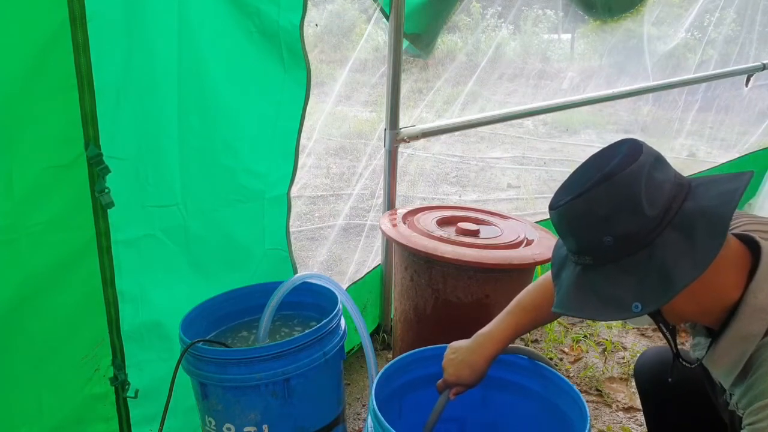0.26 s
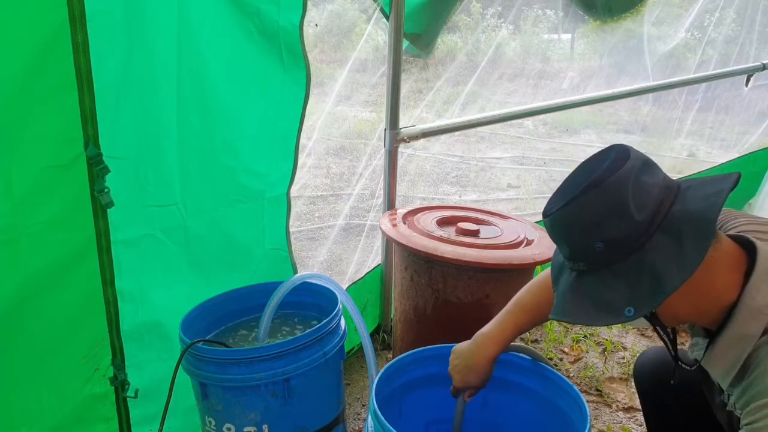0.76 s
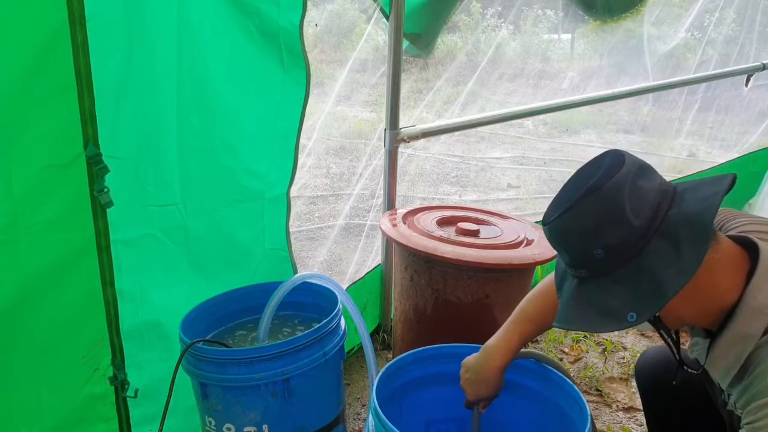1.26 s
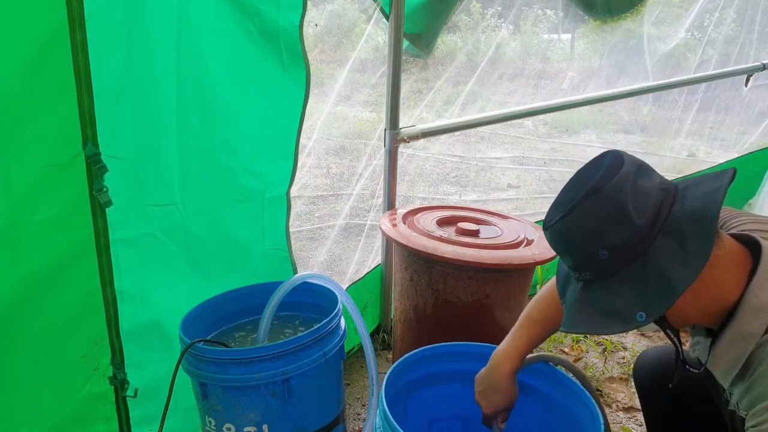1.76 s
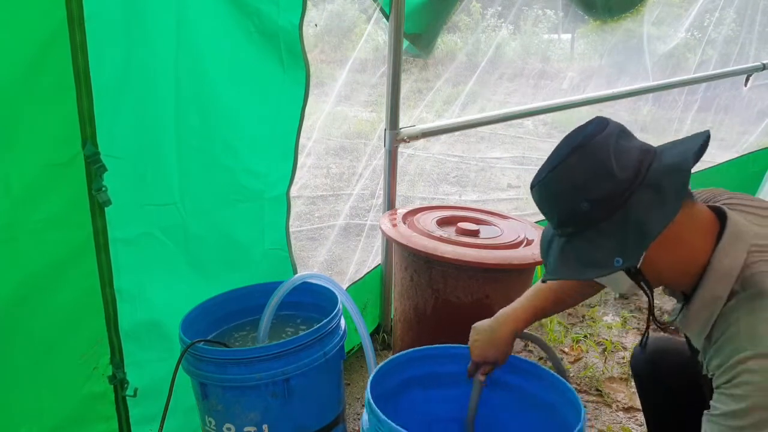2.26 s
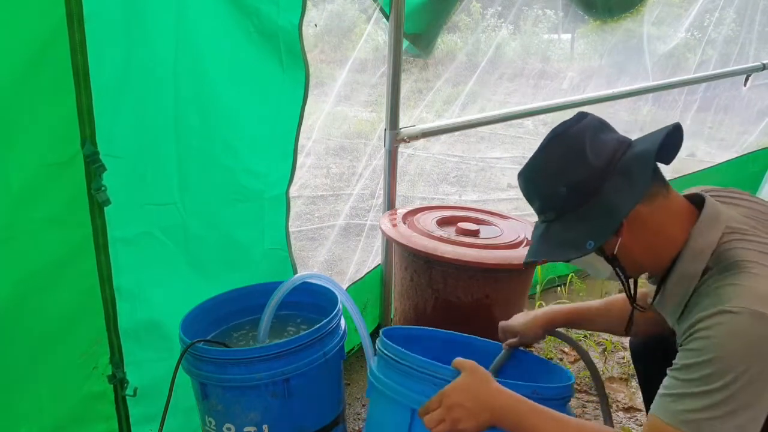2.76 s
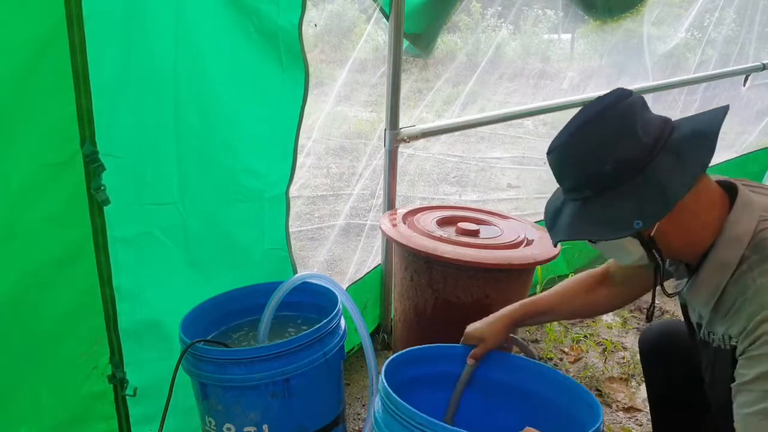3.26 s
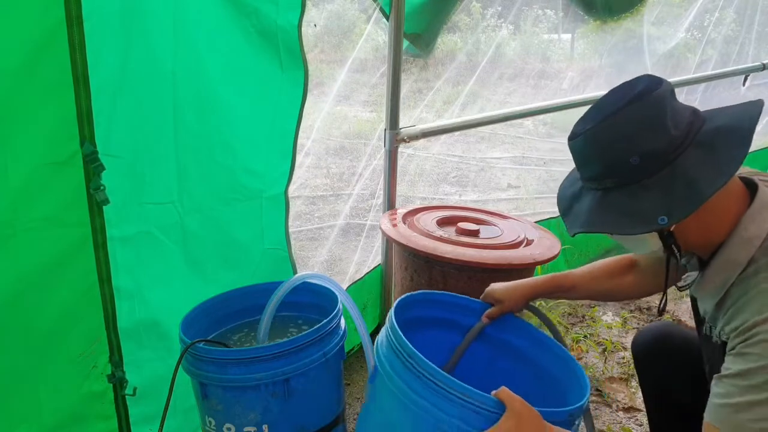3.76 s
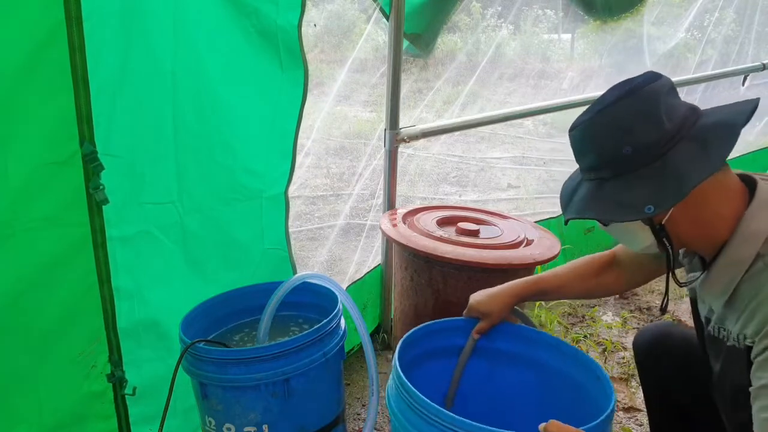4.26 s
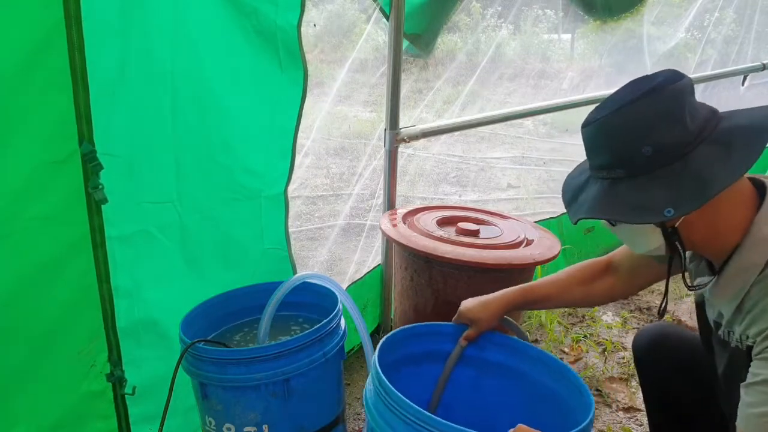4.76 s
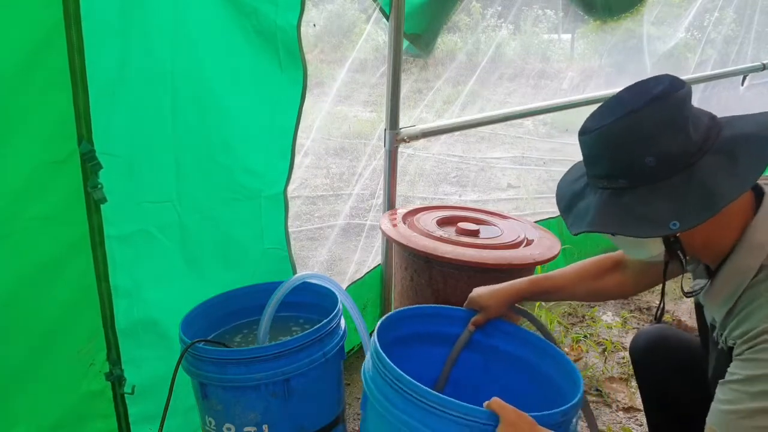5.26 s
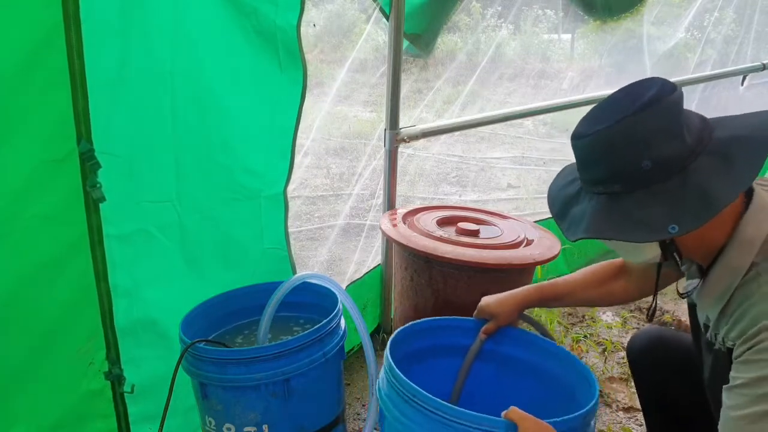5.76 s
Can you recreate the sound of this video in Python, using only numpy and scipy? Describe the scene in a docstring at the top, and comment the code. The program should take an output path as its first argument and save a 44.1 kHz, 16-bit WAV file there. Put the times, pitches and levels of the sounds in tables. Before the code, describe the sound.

Inside a small covered shelter, water drips and bubbles in a plastic bucket near the microphone. Sparse bright drops give way to denser spatter, then a dull ground bump and low grinding as the bucket is tilted. Swirling water gulps and slaps the hollow wall in uneven bursts, strongest around four seconds and in the last second and a half. Very faint pump hum lies beneath, with brief rising bird whistles late on.

```python
"""Hose water in a swirled tub

Hose water sloshes and splashes in a plastic tub, tilted and swirled under a tarpaulin shelter.
Close by: air pockets gulp as gliding sines and slap the ringing tub wall, drops plink, and shaped bubble
and click noise makes slosh, fizz and spray. The tub grinds on soil and bumps the ground once.
Behind: a small air pump hums as narrow noise bands, and a bird outside whistles gliding near-sines.
The stereo image leans right, towards the tub; the shelter answers the near sounds and the bird."""
import sys
import numpy as np
from scipy import signal
from scipy.fft import rfft, irfft, next_fast_len
from scipy.io import wavfile

SR = 44100
rng = np.random.default_rng(int(sys.argv[2]) if len(sys.argv) > 2 else 0)


def master_out(mix):
    """Clip the mix to full scale and print it as 16-bit PCM to the path in sys.argv[1]."""
    frames = np.transpose(np.atleast_2d(mix))
    ceiling = np.clip(frames, -1, 1)
    pcm = np.round(ceiling * 32767).astype(np.int16)
    wavfile.write(sys.argv[1], SR, pcm)


N = 265462

# Background air, pump drone and far hiss: [f/Hz, relative band gain/dB]
AIR_SPECTRUM = [(25, -17), (45, -0.5), (100, -7), (200, -8.5), (260, -11.5), (380, -5.5), (580, -4),
                (760, -6), (1000, -15.5), (1600, -17.5), (3000, -29.5), (8500, -30), (12500, -23),
                (16500, -23)]
AIR_DB = -68.5
# Hum bands of the air pump: [f/Hz, nominal width/Hz, rms level/dB]
PUMP_BANDS = [(45, 5.7, -84), (90.1, 10.6, -79.5), (376, 85, -77), (451, 33, -77), (702, 87, -73.5),
              (762.2, 19, -72.5), (837, 100, -80)]
# Bird notes outside: [t/s, length/s, first f/Hz, last f/Hz, end level/dB]
BIRD_NOTES = [(4.14, .1, 3480, 2500, -66), (4.957, .07, 4300, 6060, -55), (5.05, .034, 3650, 3570, -50),
              (5.227, .071, 4300, 6040, -50), (5.328, .024, 3640, 3580, -55),
              (5.488, .072, 4250, 6000, -44), (5.788, .068, 4400, 6020, -62)]
# Course of a rising note: [share of its length, share of its glide]
RISING_GLIDE = [(0, 0), (.09, .13), (.3, .56), (.88, 1), (1, 1)]
DROOP_BEND = 2.6   # exponent: falling notes droop late
CRESCENDO_DB_PER_S, NOTE_EDGE_S = 110, 0.006
# Left-right likeness of the stereo noise: [f/Hz, correlation]
LIKENESS = [(40, 0.64), (250, 0.59), (600, 0.27), (1000, 0.33), (2000, 0.094), (4000, 0.0067),
            (12000, 0.067)]

SHELTER_T60_S, SHELTER_DB = 0.2, -11
TARP_CUT_HZ, OPEN_SIDE_HZ = 12000, 700   # treble lost on each round, bass lost to the outside
BIRD_ECHO_DB = -5   # the bird is outside and stirs the shelter less

# The tub rocks on the ground: [t/s, level/dB]
DRAG_SURGES = [(2.36, -60.5), (2.68, -68), (2.81, -60.5), (3.0, -64), (3.15, -66), (3.36, -73), (3.9, -68),
               (4.0, -70), (4.1, -72)]
DRAG_HZ = (108, 280)
DRAG_SWELL_S, DRAG_SINK_S = 0.038, 0.12   # for 20 dB
# Touches of the tub on the ground: [t/s, level/dB]
BUMP_TOUCHES = [(2.316, -46), (2.335, -41), (2.352, -39.5)]
BUMP_HZ, BUMP_T60_S = 75.5, 0.029
# Modes of the tub wall: [f/Hz, level/dB, t60/s]
TUB_MODES = [(331.6, -4, 0.031), (398, -1.5, 0.048), (506, -2, 0.052), (598.5, 4.5, 0.029), (742, 4, 0.047),
             (853, -1.5, 0.065), (1030, 4.5, 0.035), (1191, -1, 0.05), (1565, -11.5, 0.071)]

# Drops on the surface: [t/s, level/dB, f/Hz, t60 of the stir/s, spatter level/dB]
DROPS = [(0.0024, -44, 6180, 0.11, -22), (0.192, -61, 5200, .084, -11), (0.2962, -51, 6000, .087, -23),
         (0.4528, -51.5, 6530, .17, -14), (0.6629, -66, 2800, .12, -11), (0.756, -63, 2540, 0.1, -11),
         (0.843, -50, 4600, 0.096, -1), (1.12, -60, 6730, .11, -8), (1.191, -42, 6300, .13, -21),
         (1.3134, -50, 3250, .13, -18), (1.463, -39.5, 2580, .12, -19), (1.5128, -38.5, 6800, 0.06, -23),
         (1.6126, -53.5, 2600, 0.14, -4), (1.716, -36, 2290, .088, -23), (1.84, -41, 2505, 0.16, -3),
         (1.958, -45.5, 2860, 0.12, 2), (2.0805, -39.5, 6700, 0.06, -29), (2.1336, -37, 3060, .07, -10),
         (2.2752, -32.5, 7330, .066, -18), (2.3758, -36, 2540, 0.13, -12), (2.4314, -36, 3050, 0.14, -9),
         (2.7683, -36, 3910, .071, -10), (3.0653, -42.5, 4970, .061, -12), (3.117, -31.5, 6500, .056, -29),
         (3.617, -45.5, 2350, 0.21, -14), (3.7179, -42.5, 5360, 0.29, -8), (3.837, -39, 4130, 0.062, -11),
         (3.8703, -30, 5270, 0.11, -5), (3.9627, -33.5, 3580, .079, -12),
         (4.0713, -29.5, 3880, 0.16, -16.5), (4.069, -20, 10100, 0.043, -35),
         (4.3594, -48.5, 2820, 0.099, -24), (4.437, -47.5, 2000, 0.26, 1), (4.6916, -26, 6070, 0.13, -8.5),
         (4.7452, -29.5, 2100, .14, -5), (5.022, -31.5, 7050, 0.11, -11), (5.1826, -32.5, 5800, 0.12, -16),
         (5.456, -27.5, 2730, 0.23, -15), (5.6946, -32, 2435, 0.074, -9), (5.878, -34, 5500, 0.076, -17),
         (5.9646, -29.5, 2630, 0.12, -30)]
DROP_CYCLES = 38   # cycles in the t60 of each small pocket
SPATTER_HZ = (3800, 12300)
# Air pockets closing: [t/s, level/dB, starting f/Hz, share of tub wall 0-1]
GULPS = [(1.039, -47, 930, .2), (1.057, -45, 916, 0.42), (1.348, -34, 685, 0.4), (1.634, -49, 1086, 0.8),
         (1.84, -31.5, 636, .45), (2.014, -47, 770, 0.62), (2.377, -40.5, 727, 0.05),
         (2.454, -42, 814, 0.1), (2.639, -33.5, 803, 0.5), (2.768, -27.5, 740, 0.29),
         (2.794, -38, 416, 0.3), (2.814, -49, 700, 0.8), (2.982, -37.5, 868, 0.46),
         (3.115, -45.5, 1630, 0.18), (3.348, -32.5, 1270, 0.37), (3.516, -35, 893, 0.5),
         (3.534, -44, 910, 0.5), (3.892, -30, 978, 0.42), (3.905, -38, 327, 0.4), (3.962, -26.5, 460, .45),
         (3.979, -30.5, 546, .35), (4.059, -25.5, 583, 0.34), (4.06, -30, 393, 0.26),
         (4.079, -47, 1010, .26), (4.124, -41, 920, 0.37), (4.484, -44, 1836, .07),
         (4.526, -36.5, 1272, 0.2), (4.747, -24.5, 1030, 0.42), (5.052, -48.5, 1275, .35),
         (5.13, -43.5, 1865, .22), (5.189, -41, 670, 0.37), (5.389, -34.5, 1706, 0.38),
         (5.441, -34, 980, 0.5), (5.844, -48.5, 930, 0.1)]
GULP_T60_S = 0.045

# Splashes: [peak t/s, swell by 20 dB/s, sink by 20 dB/s,
#            slosh level/dB, fizz level/dB, spray level/dB, churn on the wall level/dB]
# Swells under 0.003 s and sinks under 0.02 s, negatives too, are raised to those limits.
SPLASHES = [(0.002, 10, .085, -94.5, -76, -58.5, -93), (0.14, -1.5, 0.46, -84, -85, -71, -88),
            (0.193, -0.1, 0.19, -95, -66, -57.5, -90), (0.5, 0.2, 0.14, -95, -75, -72, -93),
            (0.843, .012, -0.03, -95, -58, -58, -95), (0.99, -0.02, 0.8, -73, -65, -66, -95),
            (1.06, 0.12, 0.13, -60, -62, -76, -95), (1.15, 0.1648, 0.26, -65, -82, -52, -95),
            (1.35, .01, 0.7, -70.5, -78, -75, -70.5), (1.471, 0.03, 0.08, -82, -57.5, -57, -98),
            (1.519, 0.12, 0.2, -88, -66.5, -56.5, -95), (1.645, 0, 1, -69.5, -69, -60.5, -95),
            (1.74, -0.17, 0.2, -67, -58, -53, -91), (1.84, -0.05, -0.1, -66, -58, -51, -90),
            (1.91, 0.07, -0.04, -75.5, -62.5, -47.5, -95), (1.98, 0.09, -0.46, -61.5, -60.5, -63, -93),
            (2.137, .02, -0.77, -62, -53, -50.5, -95), (2.29, 0.61, 0.7, -69, -66.5, -59, -63),
            (2.381, 0.0535, .3, -50, -50.5, -49, -54.5), (2.5, 0.1, 0.37, -57.5, -55, -55, -75),
            (2.58, 0.18, 0.43, -56, -68, -56, -52), (2.674, 0.1, 0.1362, -59, -43.5, -44, -49),
            (2.789, -0.03, 0.09, -48, -51, -58.5, -52.5), (2.986, .006, .12, -53, -64, -73, -48),
            (3.03, 0.13, 0.2, -66, -61, -62.5, -74), (3.131, 0.06, 0.29, -56.5, -60, -56, -56.5),
            (3.348, 0.02, 0.06, -40, -55, -53.5, -52), (3.36, 0.12, 0.27, -60, -57.5, -59, -69),
            (3.519, .005, .065, -53, -64, -72, -46), (3.62, .015, 0.7, -68, -64.5, -76, -67.5),
            (3.72, .012, .6, -70, -65, -63, -63), (3.871, .025, 0.1943, -45, -42.5, -38, -65),
            (3.919, 0.05, 0.1458, -44.5, -39.5, -49, -48), (3.979, 0.05, 0.04, -40.5, -45.5, -50, -37),
            (4.062, .005, .07, -46, -55, -66, -35), (4.074, .007, .06, -40, -42, -39, -44),
            (4.12, 0.16, 0.1, -63, -52, -61, -53), (4.35, 0.8, 0.6, -67.5, -61, -61.5, -83),
            (4.53, 0.03, 0.21, -51.5, -44.5, -48, -75), (4.579, 0.1159, 0.32, -56.5, -42, -51, -76),
            (4.682, 0.13, 0.2145, -45, -44, -43, -54.5), (4.748, 0.04, 0.0749, -34.5, -35.5, -40.5, -35),
            (4.83, 0.08, 0.1, -62, -49, -70, -51.5), (5.019, 0, 0.2, -90, -75.5, -57, -83),
            (5.07, .05, .25, -63, -54, -63, -65), (5.159, 0, 0.25, -67, -57, -52.5, -56),
            (5.28, 0.17, 0.54, -68, -47.5, -56.5, -66), (5.373, 0.0962, 0.22, -45.5, -43.5, -43.5, -59),
            (5.478, 0.06, 0.2141, -41, -38, -45, -49), (5.6, 0.06, -0.03, -55, -48, -60, -68),
            (5.696, 0.07, .12, -71, -48, -53.5, -66), (5.789, 0, .2, -76, -59.5, -60, -61.5),
            (5.87, 0.1, 1.7, -63, -58, -54, -62), (5.969, 0.16, 0.9, -47, -41.5, -48, -63),
            (6.015, -0.05, -4, -37.5, -50, -61, -62)]
TRICKLE_DB = (-83, -87.5, -83.5, -101)   # the hose never stops: least slosh, fizz, spray, churn
# Colour of the slosh: [f/Hz, relative band gain/dB]
SLOSH_SPECTRUM = [(600, 7.5), (900, 6.5), (1300, 12.5), (1900, 4.5), (2600, -6)]
# Colour of the fizz: [f/Hz, relative band gain/dB]
FIZZ_SPECTRUM = [(1500, -2.5), (2200, 4.5), (3200, 4), (4300, 0), (6000, 5), (7500, 1.5)]
# Colour of the spray: [f/Hz, relative band gain/dB]
SPRAY_SPECTRUM = [(3000, -12), (4500, -11), (6500, -7), (7500, -2), (9500, -7.5), (13000, -4.5),
                  (16500, -2)]

LEFT_DB, LEFT_LAG_SAMPLES = -2, 2   # left against right: the tub stands to the right
MIC_DIP_HZ, MIC_DIP_WIDTH_HZ, MIC_DIP_DB = 8490, 1400, -5
CUTOFF_HZ = 15830


def amp(db):
    """Amplitude factor of a level in dB."""
    return 10 ** (np.asarray(db) / 20)


def rms_one(x):
    """Scale a signal to rms 1."""
    return x / np.sqrt(np.mean(x ** 2) + 1e-20)


def at_hz(points, hz):
    """Read a two-column curve at a frequency, straight along log frequency."""
    table = np.array(points)
    return np.interp(np.log(hz), np.log(table[:, 0]), table[:, 1])


def drift(rate_hz):
    """Slow random wander of spread 1: noise through two equal poles at the rate."""
    step = 40   # samples between computed points
    pole = np.exp(-2 * np.pi * rate_hz * step / SR)
    noise = rng.standard_normal(N // step + 2002)
    slow = signal.lfilter([1], [1, -2 * pole, pole * pole], noise)[2000:]   # skip the settling
    return np.interp(np.arange(N) / step, np.arange(len(slow)), rms_one(slow))


def ring(force, hz, t60):
    """Resonance: a unit click sets a decaying sine of starting height 1 ringing."""
    radius = amp(-60 / (t60 * SR))
    w = 2 * np.pi * hz / SR
    return signal.lfilter([0, np.sin(w)], [1, -2 * radius * np.cos(w), radius * radius], force + 1e-18)


def colour(source, spectrum, patchy_db):
    """Shape a (mid, side) pair in narrow bands, each with its level, flicker and likeness; rms 1."""
    out = 0
    edges = 25 * 2 ** np.arange(0, 9.6, 0.4)
    lowest, highest = spectrum[0][0] / 1.2, spectrum[-1][0] * 1.2
    for k, (low, high) in enumerate(zip(edges, edges[1:])):
        hz = np.sqrt(low * high)
        if not lowest < hz < highest:
            continue
        band = signal.butter(2, [low, high], "band", fs=SR, output="sos")
        mid, side = signal.sosfilt(band, source)
        alike = np.clip(at_hz(LIKENESS, hz), -1, 1)
        stereo = np.sqrt(1 + alike) * mid + np.sqrt(1 - alike) * side * [[1], [-1]]
        sign = (-1) ** k   # alternate signs join the band edges
        out = out + sign * amp(at_hz(spectrum, hz) + patchy_db * drift(5.8)) * stereo
    return rms_one(out)


def grains(per_s, spread_db):
    """Single-sample clicks at random moments, of very uneven size and either sign."""
    sizes = amp(spread_db * np.minimum(rng.exponential(1, (2, N)), 5))
    signs = rng.choice([-1, 1], (2, N))
    return sizes * signs * (rng.random((2, N)) < per_s / SR)


def add(out, start_s, piece):
    """Lay a piece into the track at a time, cut at the end."""
    i = round(start_s * SR)
    out[i:i + len(piece)] += piece[:N - i]


def swell(peak_s, swell_s, sink_s):
    """Power over time of one surge that peaks at 1, rising and falling evenly in dB."""
    t = np.arange(0, N, 32) / SR - peak_s
    return amp(40 * np.minimum(t / max(swell_s, 0.003), -t / max(sink_s, 0.02)))


def surges(shapes, db):
    """Gain over time: the surges add up in power."""
    power = amp(db) ** 2 @ np.array(shapes)
    return np.interp(np.arange(N), np.arange(0, N, 32), np.sqrt(power))


def air():
    """Low drone and far hiss: steady noise in bands that flicker slowly."""
    return amp(AIR_DB) * colour(rng.standard_normal((2, N)), AIR_SPECTRUM, patchy_db=5.0)


def pump():
    """Small air pump: wavering hum bands, noise sent twice through narrow resonances."""
    out = np.zeros(N)
    for hz, width_hz, db in PUMP_BANDS:
        t60 = 2.1 / width_hz
        hum = ring(ring(rng.standard_normal(N), hz, t60), hz, t60)
        out += amp(db) * rms_one(hum)
    return out


def bird():
    """Near-sine whistles that glide and grow louder, with a slight flutter in pitch and level."""
    out = np.zeros(N)
    pitch_flutter, level_flutter = drift(90), drift(90)
    for s, length_s, first_hz, last_hz, end_db in BIRD_NOTES:
        at = np.arange(round(s * SR), round((s + length_s) * SR))
        u = np.linspace(0, 1, len(at))   # share of the note gone by
        if last_hz > first_hz:
            glide = np.interp(u, *np.transpose(RISING_GLIDE))
        else:
            glide = u ** DROOP_BEND
        pitch = (first_hz + (last_hz - first_hz) * glide) * (1 + 0.011 * pitch_flutter[at])
        edges = np.clip(np.minimum(u, 1 - u) * length_s / NOTE_EDGE_S, 0, 1)
        db = end_db - CRESCENDO_DB_PER_S * length_s * (1 - u) + 2.5 * level_flutter[at]
        out[at] = np.sqrt(2) * edges * amp(db) * np.sin(2 * np.pi * np.cumsum(pitch) / SR)
    return out


def shelter(x):
    """Eight feedback delays a side, duller on every round; the bass escapes through the tarpaulin."""
    size = next_fast_len(N + SR)
    hz = np.arange(size // 2 + 1) / size * SR
    dull = 1 / (1 + 1j * hz / TARP_CUT_HZ)
    bass_loss = hz / (hz - 1j * OPEN_SIDE_HZ)
    spectrum = rfft(x, size)
    sides = []
    for delays_s in rng.uniform(0.006, 0.03, (2, 8)):
        echoes = 0
        for k, delay_s in enumerate(delays_s):
            one_round = amp(-60 * delay_s / SHELTER_T60_S) * dull * np.exp(-2j * np.pi * hz * delay_s)
            echoes = echoes + (-1) ** k * one_round / (1 - one_round)   # all rounds summed
        sides.append(irfft(spectrum * echoes * bass_loss, size)[:N])
    return np.array(sides)


def drag():
    """The loaded tub grinds on soil: dense soft contacts, only lows."""
    shapes = [swell(s, DRAG_SWELL_S, DRAG_SINK_S) for s, db in DRAG_SURGES]
    gain = surges(shapes, np.transpose(DRAG_SURGES)[1])
    lows = signal.butter(2, DRAG_HZ, "band", fs=SR, output="sos")
    return gain * rms_one(signal.sosfilt(lows, grains(900, 1.5)[0]))


def bump():
    """The full tub lands softly: a low short thud in three touches."""
    clicks = np.zeros(N)
    for s, db in BUMP_TOUCHES:
        clicks[round(s * SR)] = amp(db)
    return ring(clicks, BUMP_HZ, BUMP_T60_S)


def tub(force):
    """The plastic wall: a set of modes rung by a force."""
    out = 0
    for k, (hz, db, t60) in enumerate(TUB_MODES):
        out = out + (-1) ** k * amp(db) * ring(force, hz, t60)
    return out


def splashing():
    """Gains over time of slosh, fizz, spray and churn: surges above a steady trickle."""
    shapes = [swell(*row[:3]) for row in SPLASHES]
    levels = np.transpose(SPLASHES)[3:]
    return [np.hypot(surges(shapes, db), amp(least_db)) for db, least_db in zip(levels, TRICKLE_DB)]


def churn():
    """Dense soft slaps of water on the wall."""
    slaps = grains(700, 2.2)[0]
    return splashing()[3] * rms_one(tub(slaps))


def pocket(hz, t60, rise, swell_s, hold):
    """One air pocket: a sine that swells, holds, dies and climbs in pitch as it nears the surface."""
    t = np.arange(int(0.25 * SR)) / SR
    shape = (1 - np.exp(-t / swell_s)) * amp(-60 * (t / t60) ** hold)
    return t, shape / shape.max() * np.sin(2 * np.pi * hz * (t + rise * t * t / t60))


def drops():
    """A tick of impact, a small pocket with a cluster of neighbours near its pitch, and a broad spatter."""
    out = np.zeros(N)
    band = signal.butter(2, SPATTER_HZ, "band", fs=SR)
    for s, db, hz, stir_t60, spatter_db in DROPS:
        t, tone = pocket(hz, DROP_CYCLES / hz, rise=0.04, swell_s=0.001, hold=1.1)
        stir = rng.standard_normal(len(t)) * amp(-60 * t / stir_t60)
        cluster = ring(ring(stir, hz, 0.66 * DROP_CYCLES / hz), hz, 6.3 / hz)
        cluster = cluster / np.abs(cluster).max()
        tick = 1.6 * amp(-60 * t / 0.0012)
        burst = amp(-60 * t / (2.5 * stir_t60)) + tick
        spatter = signal.lfilter(*band, rng.standard_normal(len(t)) * burst)
        add(out, s, amp(db) * (0.5 * tone + 0.46 * cluster + amp(spatter_db) * spatter))
    return out


def gulps():
    """A large pocket rings while the collapsing water drums on the wall for some ms."""
    out = np.zeros(N)
    for s, db, hz, wall in GULPS:
        t, tone = pocket(hz, GULP_T60_S, rise=0.075, swell_s=0.0018, hold=1.33)
        drum = tub(rng.standard_normal(len(t)) * amp(-60 * t / (1.14 * GULP_T60_S)))
        drum = drum / np.abs(drum).max()
        share = np.clip(wall, 0, 1)
        add(out, s, amp(db) * ((1 - share) * tone + share * drum))
    return out


def bubbles(per_s, low_hz, high_hz, cycles):
    """Random bubbles that swell and ring some cycles each, at nine pitches between the limits."""
    clicks = grains(per_s, 0.66)
    dealt = rng.integers(0, 9, N)   # which pitch each moment gets
    out = 0
    for k, hz in enumerate(np.geomspace(low_hz, high_hz, 9)):
        t60 = cycles / hz
        ringing = ring(clicks * (dealt == k), hz, t60)
        out = out + rms_one(ring(ringing, hz, 0.081 * t60))   # the short second ring softens the onset
    return rms_one(out)


def water():
    """Gurgles and plips over bubbles in the slosh and finer fizz, with spray close to hiss."""
    gurgles = amp(-3) * bubbles(80, 800, 2300, 45.0)
    plips = amp(-3) * bubbles(200, 1900, 6000, 60.0)
    slosh = colour(bubbles(1100, 708, 2466, 36.0) + gurgles, SLOSH_SPECTRUM, patchy_db=0.0)
    fizz = colour(bubbles(3500, 1717, 6700, 16.7) + plips, FIZZ_SPECTRUM, patchy_db=4.5)
    spurts = grains(14000, 1.9) * amp(1.55 * drift(66))   # uneven spurts
    spray = colour(spurts, SPRAY_SPECTRUM, patchy_db=-1.05)
    slosh_gain, fizz_gain, spray_gain, _ = splashing()
    return slosh_gain * slosh + fizz_gain * fizz + spray_gain * spray


def scene():
    """Near and far sources with the shelter's echoes, the whole image leaning right."""
    near = drag() + bump() + churn() + drops() + gulps()
    song = bird()
    sources = near + song + pump()
    direct = np.array([np.roll(sources, LEFT_LAG_SAMPLES), sources])
    echoes = amp(SHELTER_DB) * shelter(near + amp(BIRD_ECHO_DB) * song)
    balance = amp([[LEFT_DB / 2], [-LEFT_DB / 2]])
    return (direct + echoes + water() + air()) * balance


def record(dry):
    """The microphone loses the deepest bass and dips in the treble; the top is cut."""
    peak = signal.iirpeak(MIC_DIP_HZ, MIC_DIP_HZ / MIC_DIP_WIDTH_HZ, fs=SR)
    dipped = dry + (amp(MIC_DIP_DB) - 1) * signal.lfilter(*peak, dry)
    bass_cut = signal.sosfilt(signal.butter(3, 36.0, "high", fs=SR, output="sos"), dipped)
    top_cut = signal.ellip(14, 0.5, 75, CUTOFF_HZ, fs=SR, output="sos")
    return signal.sosfilt(top_cut, bass_cut)


dry = scene()
out = record(dry)
master_out(out)
```